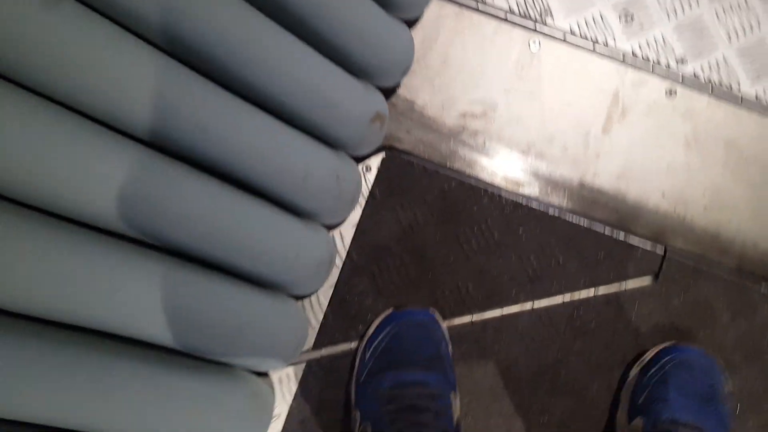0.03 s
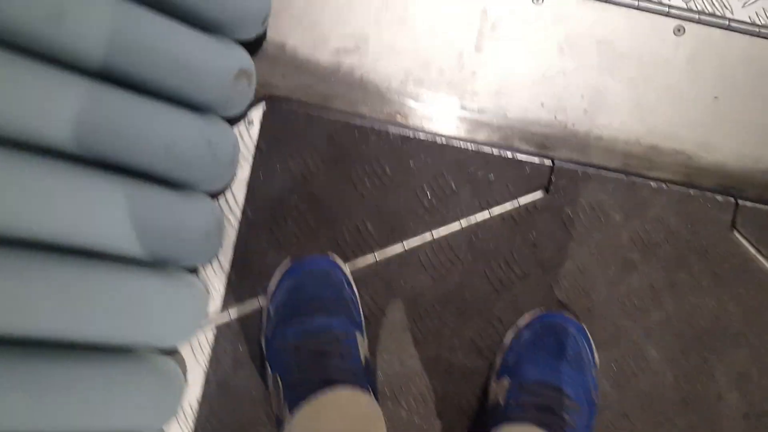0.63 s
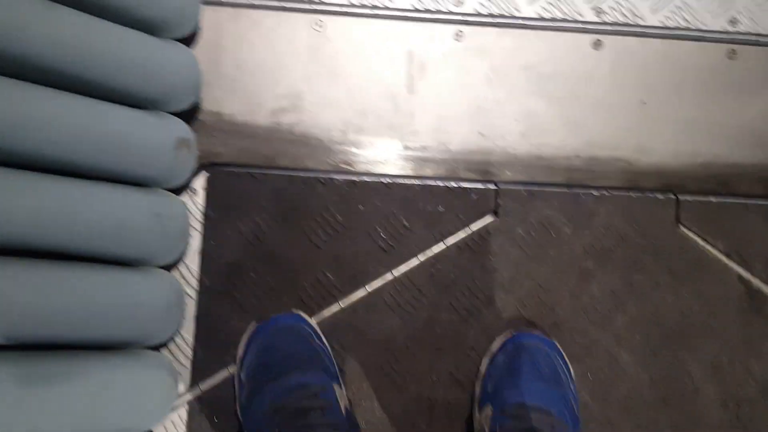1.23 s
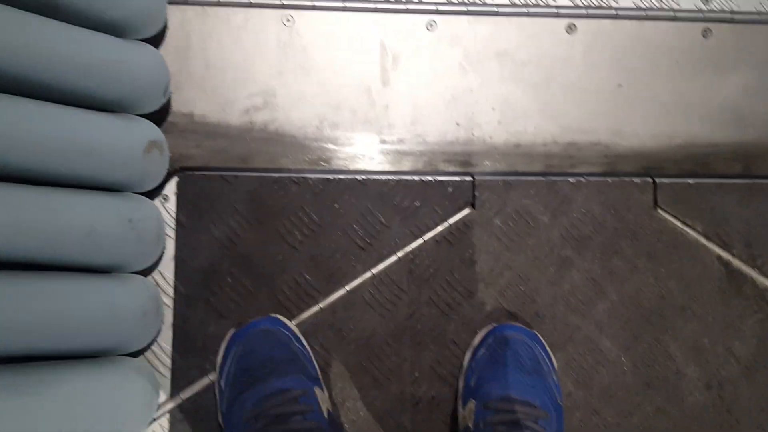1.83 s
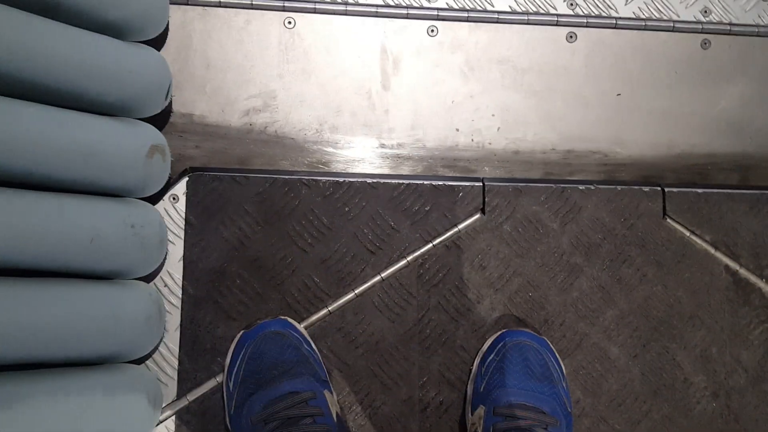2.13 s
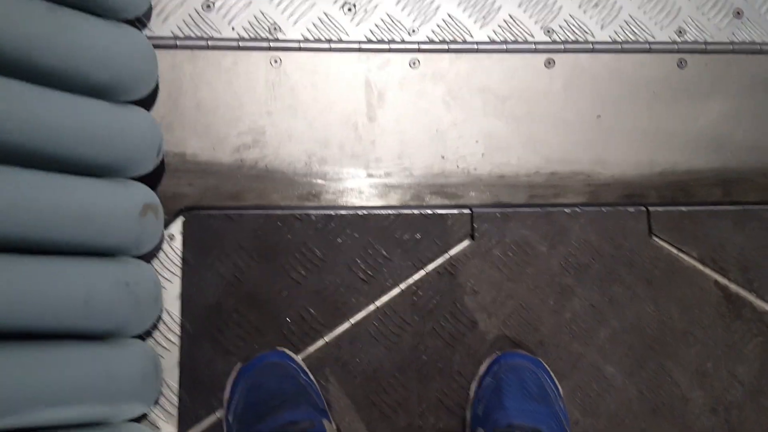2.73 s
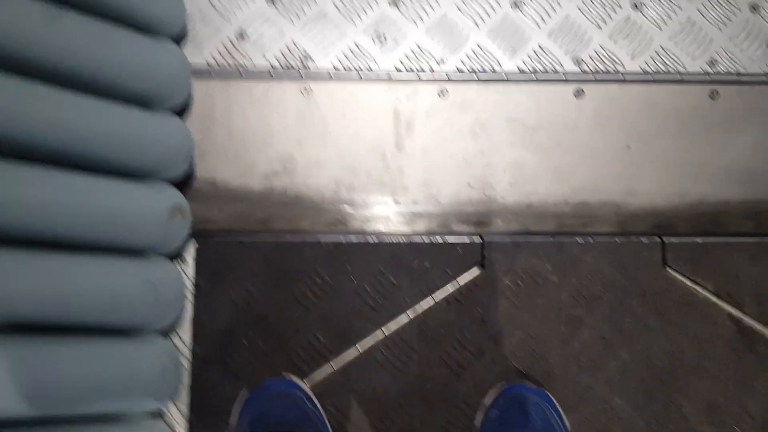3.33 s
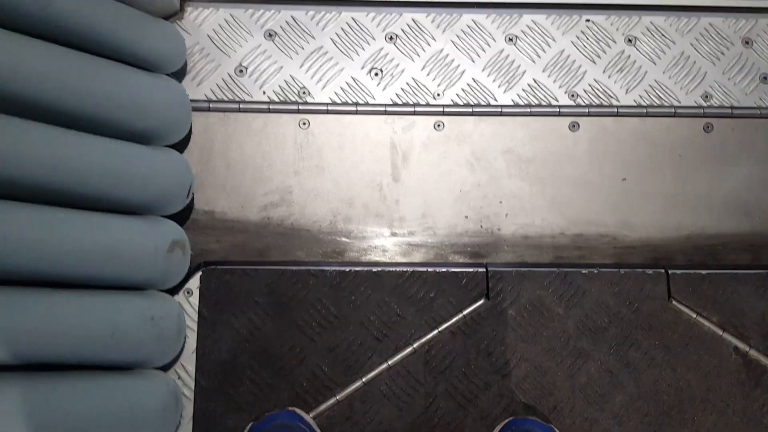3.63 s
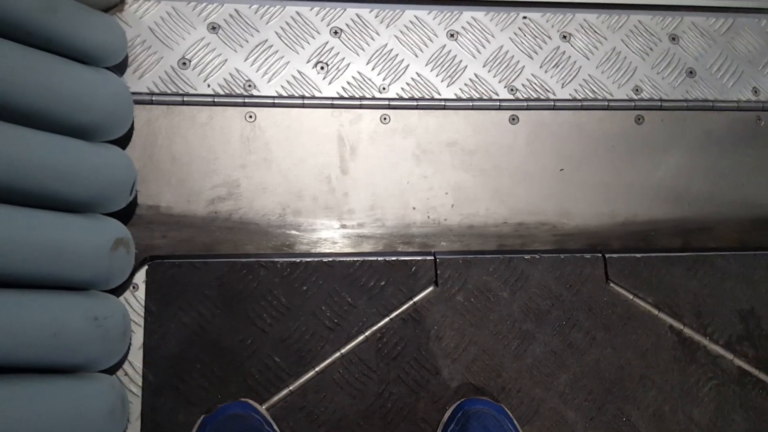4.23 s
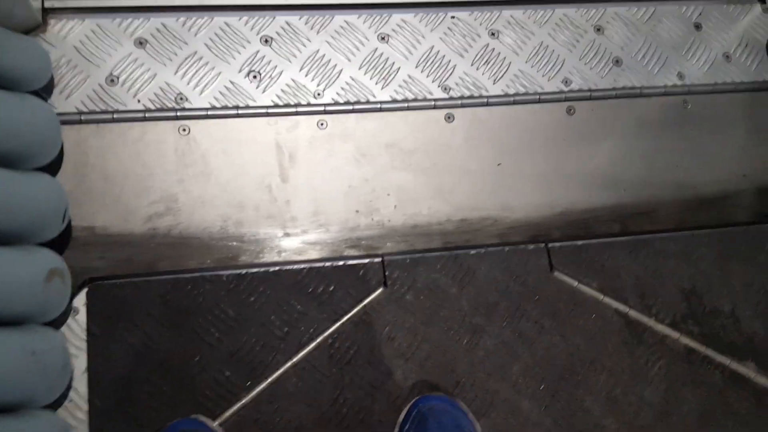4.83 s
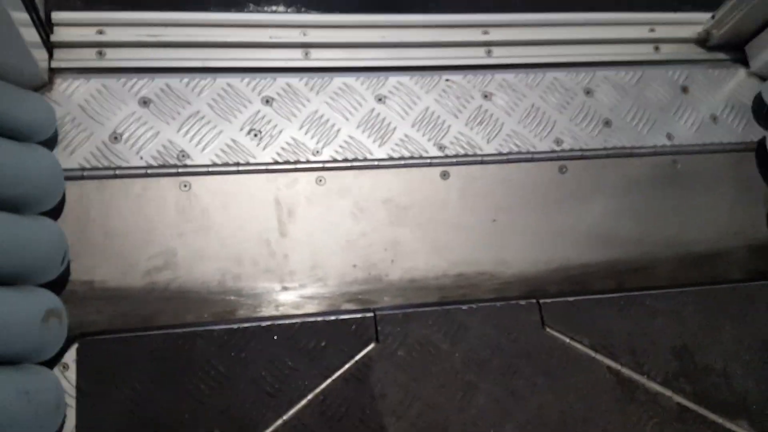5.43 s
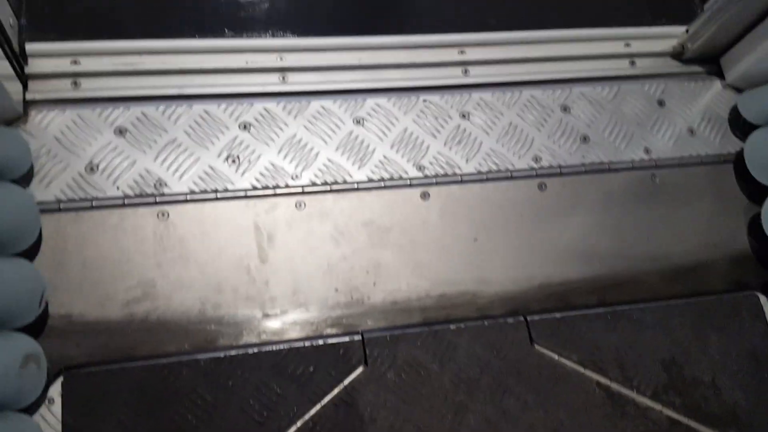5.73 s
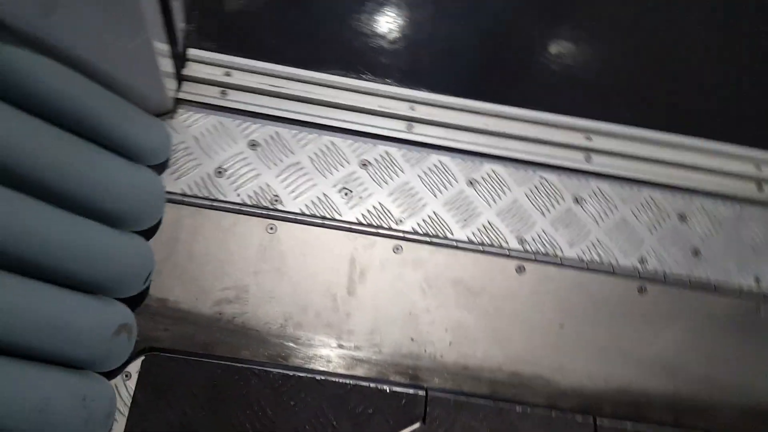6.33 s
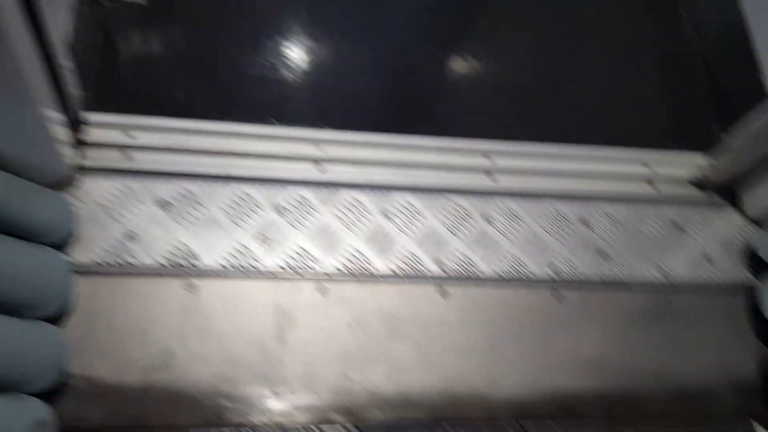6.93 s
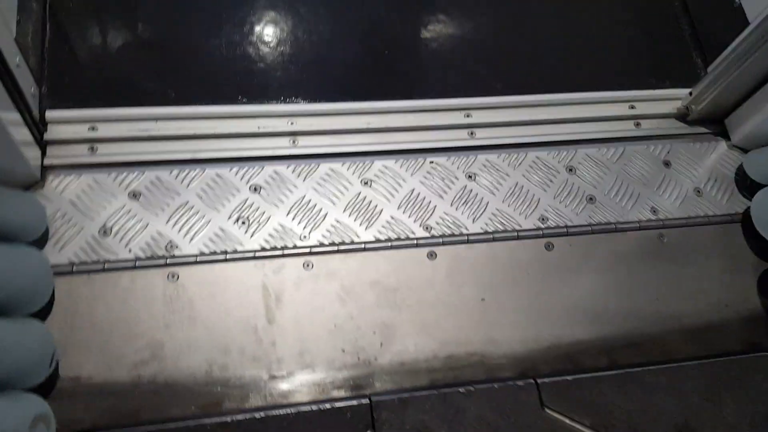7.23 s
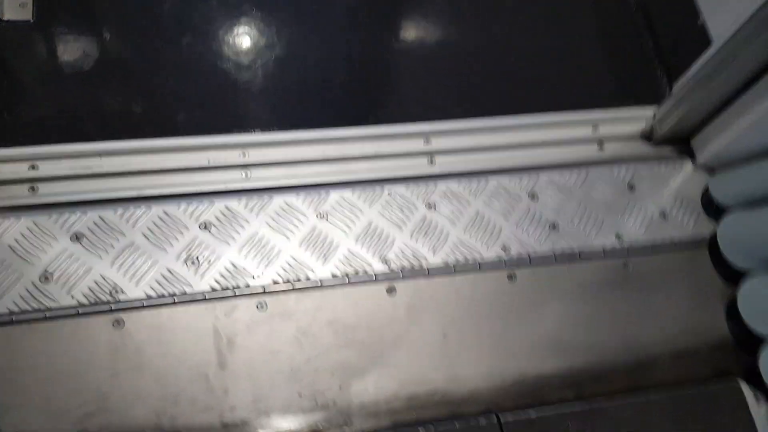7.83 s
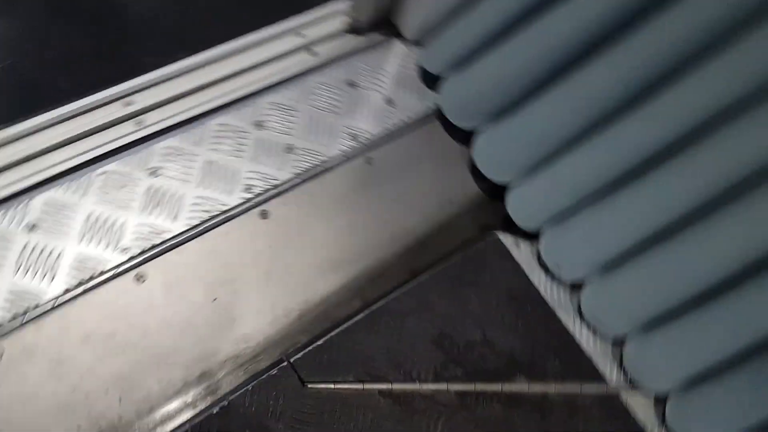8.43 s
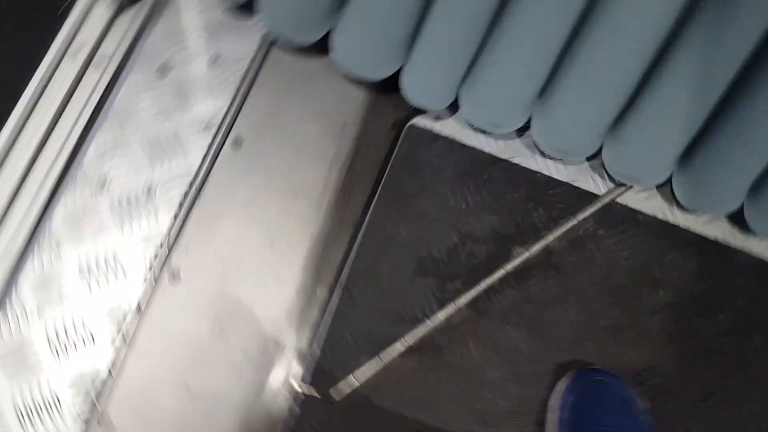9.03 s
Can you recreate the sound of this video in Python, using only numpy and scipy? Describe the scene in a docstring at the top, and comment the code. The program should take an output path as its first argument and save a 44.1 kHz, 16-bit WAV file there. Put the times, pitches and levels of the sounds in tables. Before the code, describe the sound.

A fast train rolls steadily for about nine seconds, heard from inside the enclosed gangway between two cars. The floor, walls and metal plates resonate with a low rumble and a hollow boom, strongest at the very start. Over this sit the roar of the rails and a mid-pitched wheel drone that wanders slightly in pitch, swelling around 4.3 and 8 seconds. Air rushes past the rubber bellows throughout with a soft hiss, leaning a little to the right. A faint steel ring from the wheels rises briefly near 5.2 and 6.7 seconds. During the first second and a half, clothing rubs quietly close to the microphone in several short strokes. Loose fittings give faint, bright ticks around 2 seconds, again at 3.5 and 3.9, and a few more between 8.5 and 9 seconds. The ride continues to the end.

```python
"""In the gangway between two cars of a fast train.
Rolling wheels force the floor, walls, plates and enclosed air into resonance, and rippled rail adds
a drone of wandering pitch, a roar and a faint ring of steel. Turbulent air rushes past the rubber
bellows. Close by, cloth rubs in stick-slip friction at first; then loose fittings give a few bright ticks."""
import sys
import numpy as np
from scipy import signal
from scipy.fft import rfft, irfft, next_fast_len
from scipy.io import wavfile
from scipy.ndimage import uniform_filter1d, minimum_filter1d, map_coordinates

SR = 44100
rng = np.random.default_rng(int(sys.argv[2]) if len(sys.argv) > 2 else 0)


def generate_wav(signal):
    """Clip the signal to [-1, 1] and save it as 16-bit WAV at the path in sys.argv[1]."""
    frames = np.transpose(np.atleast_2d(signal))
    scaled = np.clip(frames, -1, 1) * 32767
    pcm = np.round(scaled).astype(np.int16)
    wavfile.write(sys.argv[1], SR, pcm)


N = 404838
TIME = np.arange(N) / SR
FFT_SIZE = next_fast_len(N, real=True)
BIN_HZ = np.maximum(np.arange(FFT_SIZE // 2 + 1) * SR / FFT_SIZE, 1)

# Resonances. Each row: frequency in Hz, width in Hz, relative level in dB, left minus right in dB.
FLOOR_RESONANCES = [(37, 23, -41, -1), (56, 16, -32.5, 0), (90.6, 33, -34, -1)]  # floor plates over the bogies
WALL_RESONANCES = [(268.4, 19, -31.5, 1.5), (305.2, 18.3, -26.5, -3.5), (311, 106, -26.5, 0)]  # large wall panels
PLATE_RESONANCES = [(370.8, 16, -22, 1), (372, 87, -19, -1.5), (415, 27, -23.5, -1.5)]  # smaller door and tread plates
STANDING_WAVE = [(192.5, 39, -22.8, 3)]  # air across the passage
BELLOWS_CAVITY = [(137.6, 63, -28, 0.5)]  # the hollow of the bellows
DRONE_CORE = [(444.3, 14.3, -20, 0.5)]  # narrow peak of the rolling drone
DRONE_HUMP = [(449.7, 51, -20, 0)]  # broad band beneath that peak
PASSAGE_RESONANCES = [(491.6, 18, -29.5, 0), (511.4, 20, -30.5, 1), (514, 185, -22, -0.5),
                      (552, 25, -40, 1), (628, 26, -36.5, -7), (684, 22, -34, 2), (736, 443, -28, -2)]  # the passage, driven by rail roar
WHEEL_RESONANCES = [(1210, 35, -5, -5), (1860, 41, 2, -3), (2482, 55, -3.5, -5)]  # steel wheels
FIBRE_RESONANCES = [(7500, 1100, -1, 0), (11300, 2000, 1, 4), (14600, 4000, -10, 7)]  # sliding cloth

# Slow courses of loudness. Each row: time in seconds, base level in dB.
FLOOR_LEVEL = [(0, -32.5), (1.1, -35.5), (2.1, -29), (3.7, -29.5), (5.4, -30), (6.8, -28.6), (7.6, -28.5),
               (8.4, -32.5), (8.8, -30), (9.18, -27)]  # rumble of the bogies in the floor
ROAR_LEVEL = [(0, -19), (1, -19.5), (3.6, -19.5), (4.7, -19), (5.5, -18.5), (6.9, -19.5), (8, -16.5),
              (8.5, -21), (9.18, -16)]  # roar of the rails
AIR_LEVEL = [(0, -29.8), (0.7, -31.5), (1.6, -31.5), (2.1, -29.5), (3.4, -28), (4.3, -29), (5.2, -28),
             (5.6, -29.1), (6.7, -27.5), (7.7, -28.9), (8.2, -30.8), (8.6, -30.5), (8.9, -28), (9.18, -29)]  # flow past the bellows
# Surges and lulls of single parts. Each row: middle in seconds, length in seconds, gain in dB, part.
PART_SURGES = [(0.173, 0.66, 8, "boom"), (0.95, .9, 3, "boom"), (3.407, .25, 5, "boom"),
               (3.95, .8, 3.5, "boom"), (5.32, 0.28, -9, "boom"), (6.78, 0.32, 4, "boom"),
               (7.0, .2, 6.5, "boom"), (7.74, 0.32, 3.5, "boom"), (8.303, 0.81, -2.5, "boom"),
               (8.824, .35, 4, "boom"), (0.17, 0.6, 3, "walls"), (1.41, 0.25, 7.5, "walls"),
               (2.27, .4, 6, "walls"), (3.06, .35, 3.5, "walls"), (6.97, 0.43, -9, "walls"),
               (7.927, 0.27, 6.5, "walls"), (8.2, 0.23, 8.5, "walls"), (0.103, 0.16, 6.5, "plates"),
               (0.85, 1.1, 1.5, "plates"), (2.11, .4, 2.5, "plates"), (3.907, 0.37, 7.5, "plates"),
               (5.61, .35, 7.5, "plates"), (0.35, .6, -4, "drone"), (0.75, 0.11, 4, "drone"),
               (1.267, .5, 2, "drone"), (2.897, 0.23, 4.5, "drone"), (4.327, 1.15, 4.5, "drone"),
               (4.94, 0.26, -3.5, "drone"), (6.322, 0.34, 4.5, "drone"), (6.675, 0.64, -3.5, "drone"),
               (7.2, 0.58, 3, "drone"), (8.07, 0.2, 9, "drone"), (8.6, 0.97, -5, "drone"),
               (9.025, 0.12, 4.5, "drone"), (5.502, 0.62, 3, "rails"), (6.312, 0.58, 2, "rails"),
               (8.04, .15, 4, "rails"), (0.15, .5, 2, "bellows"), (2.2, 0.77, 3, "bellows"),
               (6.5, 1.4, 3, "bellows"), (3.2, .35, 1, "floor"), (7.41, 0.26, 5, "floor"),
               (5.22, .25, 10, "steel"), (6.7, 0.18, 5, "steel")]
# Wander of the drone, used as a ratio to its mean. Each row: time in seconds, nominal pitch in Hz.
DRONE_WANDER = [(0, 435.9), (0.8, 420.4), (1.3, 434.9), (2.7, 442), (3.7, 439.1), (4.3, 450.2),
                (5.1, 451.3), (6.3, 441.6), (7.2, 464.4), (8.0, 444.4), (9.18, 447.3)]
# Likeness of the sound on the two sides. Each row: frequency in Hz, correlation.
SIDE_CORRELATION = [(50, 0.98), (100, 1), (240, 0.84), (400, 0.95), (520, 0.71), (680, 0.58), (880, 0.2),
                    (1500, -0.32), (2650, 0.095), (3700, -0.21), (5500, 0)]
# Spectra of the rushing air and its fine hiss. Each row: frequency in Hz, relative spectral level in dB.
RUSH_SPECTRUM = [(530, -34), (900, -8.5), (1050, -1), (1140, -5), (1240, -4), (1390, -4), (1630, -5),
                 (1870, -3), (2320, -7.5), (2740, -7.5), (3600, -22.5), (4680, -53), (7920, -120)]
HISS_SPECTRUM = [(2120, -22), (3600, -1), (4770, 0), (6050, -5.5), (7450, -3), (10900, -17), (15500, -27)]
# Air leaks in mostly on the right. Each row: frequency in Hz, left minus right in dB.
LEAK_BALANCE = [(1050, 0), (1300, -4.5), (1900, -4), (2850, -11), (3600, -1.5), (4100, 1.5), (5000, -7.5),
                (6500, 1), (7600, -0.5), (8900, -2), (10200, 4.5), (15000, 3)]
# Strokes of the cloth. Each row: start in seconds, length in seconds, level in dB.
CLOTH_STROKES = [(-0.02, .11, -50), (0.1, .07, -45), (0.22, .07, -44.5), (0.572, .055, -50.5),
                 (0.85, 0.054, -45.5), (1.155, .05, -48), (1.24, .05, -47), (1.41, .04, -52)]
# Ticks of loose fittings. Each row: start in seconds, level in dB, band centre in Hz, T60 in seconds.
FITTING_TICKS = [(1.862, -58, 13500, .15), (2.178, -59, 13500, .06), (2.188, -49, 12500, .09),
                 (3.481, -48, 13500, .11), (3.857, -59, 13000, .1), (8.537, -57, 11500, .1),
                 (8.692, -59, 13500, .15), (8.932, -52, 13000, .17), (8.942, -50, 9700, 0.17)]


def from_db(db):
    """Amplitude grows tenfold for every 20 dB."""
    return 10 ** (np.asarray(db) / 20)


def unit(x):
    """Normalisation: the mean of the two channels is brought to rms 1."""
    return x / np.sqrt(np.mean(x.mean(axis=0) ** 2) + 1e-20)


def over_time(rows):
    """Linear interpolation gives a curve's value at every sample."""
    seconds, value = np.transpose(rows)
    return np.interp(TIME, seconds, value)


def over_hz(rows):
    """Interpolation in log frequency gives a curve's value at every bin."""
    hz, value = np.transpose(rows)
    return np.interp(np.log(BIN_HZ), np.log(hz), value)


def sides(balance_db):
    """An interaural level difference, split evenly into left and right gains."""
    return from_db(np.array([[.5], [-.5]]) * balance_db)


def drift(rate_hz):
    """Low-pass filtered noise wanders slowly, with standard deviation 1."""
    step = 100
    count = N // step
    pole = np.exp(-2 * np.pi * rate_hz * step / SR)
    slow = signal.lfilter([1], [1, -2 * pole, pole * pole], rng.standard_normal(2 * count))[count:]
    return np.interp(np.arange(N) / step, np.arange(count), slow / slow.std())


def flutter(depth_db, rate_hz):
    """Random amplitude modulation: a gain that wavers."""
    return from_db(depth_db * drift(rate_hz))


def surges_db(part):
    """Slow amplitude modulation: each surge or lull of a part is a raised-cosine arch in dB."""
    return sum(gain_db * np.cos(np.pi * np.clip((TIME - middle_s) / length_s, -.5, .5)) ** 2
               for middle_s, length_s, gain_db, name in PART_SURGES if name == part)


def read_at(x, position):
    """Fractional delay: a stereo sound is read between its samples."""
    return np.array([map_coordinates(channel, [position], order=1, mode="mirror") for channel in x])


def resonances(modes):
    """Incoherent addition: the powers of steep-sided resonances sum to a left and right response."""
    power = 0
    for hz, width, level_db, balance_db in modes:
        detuning = (BIN_HZ ** 2 - hz ** 2) / (BIN_HZ * width)
        power = power + (from_db(level_db) * sides(balance_db)) ** 2 / (width * (1 + detuning ** 2) ** 2)
    return np.sqrt(power)


def diffuse(response):
    """A diffuse field: filtered noise arrives from all round, and long waves reach both sides alike."""
    mid, side = rfft(rng.standard_normal((2, FFT_SIZE)))
    correlation = np.clip(over_hz(SIDE_CORRELATION), -1, 1)
    pair = np.sqrt(1 + correlation) * mid + np.sqrt(1 - correlation) * side * [[1], [-1]]
    return unit(irfft(pair * response, FFT_SIZE)[:, :N])


def steadied(x, span_s, share):
    """Compression: a share of the swells in running power is divided out, and the result normalised."""
    power = uniform_filter1d(x.mean(axis=0) ** 2, int(span_s * SR))
    return unit(x / (power + 1e-9) ** (share / 2))


def ringing(modes, level_db, span_s, share):
    """Forced vibration: resonances under random drive, steadied and set to a level."""
    return from_db(level_db) * steadied(diffuse(resonances(modes)), span_s, share)


def panel_rumble(wall_db=-22.5, plate_db=-19):
    """Structure-borne sound: the bogies shake floor, walls and plates, each in its own modes."""
    floor_db = over_time(FLOOR_LEVEL) + surges_db("floor")
    floor = ringing(FLOOR_RESONANCES, floor_db, span_s=.18, share=.88)
    walls = ringing(WALL_RESONANCES, wall_db + surges_db("walls"), span_s=.09, share=.44)
    plates = ringing(PLATE_RESONANCES, plate_db + surges_db("plates"), span_s=.057, share=.35)
    return floor + walls + plates


def passage_boom(settled_db=-26, extra_db=6, settle_s=5.7):
    """A standing wave between the walls booms strongly at first, then settles."""
    level_db = settled_db + extra_db * np.exp(-TIME / settle_s) + surges_db("boom")
    return ringing(STANDING_WAVE, level_db, span_s=.15, share=.64)


def bellows_hum(base_db=-29, coupling=.25):
    """Cavity resonance: the hollow of the bellows follows a share of the floor's slow swings in level."""
    floor_db = over_time(FLOOR_LEVEL)
    level_db = base_db + coupling * (floor_db - floor_db.mean()) + surges_db("bellows")
    return ringing(BELLOWS_CAVITY, level_db, span_s=.18, share=.45)


def wheel_drone(base_db=-17.5):
    """Corrugation noise: rippled rail drives the wheels at a wandering pitch, over a broad fixed band."""
    wander = over_time(DRONE_WANDER)
    core = ringing(DRONE_CORE, level_db=-2.6, span_s=.089, share=.9)
    core = read_at(core, np.cumsum(wander / wander.mean()))
    hump = ringing(DRONE_HUMP, level_db=-2.96, span_s=.065, share=.75)
    surge_db = surges_db("drone")
    singing = from_db(.35 * surge_db)  # the stronger the drone, the more its core stands out
    return from_db(base_db + surge_db) * (core * singing + hump / singing)


def rail_roar():
    """Broadband rolling noise excites the acoustic modes of the passage."""
    level_db = over_time(ROAR_LEVEL) + surges_db("rails") + .58
    return ringing(PASSAGE_RESONANCES, level_db, span_s=.22, share=.35)


def wheel_ring(base_db=-43, db_per_air_db=1.8):
    """The steel wheels ring faintly at their natural frequencies, swelling along with the rush of air."""
    air_db = over_time(AIR_LEVEL)
    level_db = base_db + db_per_air_db * (air_db - air_db.mean()) + surges_db("steel")
    return ringing(WHEEL_RESONANCES, level_db, span_s=.2, share=.6)


def wall_echoes(x, echo_gain, sway_s, count=5):
    """Comb filtering: close reflections ripple the spectrum; the ripples slide as the listener sways."""
    out = x
    for delay_s in rng.uniform(.00205, .016, count):
        departure_s = TIME - delay_s - sway_s * drift(rate_hz=.28)
        out = out + echo_gain * read_at(x, departure_s * SR)
    return unit(out)


def air_rush():
    """Turbulence on the bellows makes noise; the rubber passes the rush and holds back most hiss."""
    air_db = over_time(AIR_LEVEL)
    lean = sides(over_hz(LEAK_BALANCE))
    rush = diffuse(from_db(over_hz(RUSH_SPECTRUM)) * lean)
    rush = wall_echoes(rush, echo_gain=.075, sway_s=.00014) * flutter(depth_db=.5, rate_hz=38)
    hiss = diffuse(from_db(over_hz(HISS_SPECTRUM)) * lean)
    hiss = wall_echoes(hiss, echo_gain=.08, sway_s=.00008)
    hiss_db = -14.5 - .23 * (air_db - air_db.mean())  # relative to the rush: the hiss swells less
    return from_db(air_db - .04) * flutter(depth_db=.69, rate_hz=19) * (rush + from_db(hiss_db) * hiss)


def cloth_rub(attack_s=.026, t60_s=.65, slide_db=-58, slide_end_s=1.7, slide_fade_s=.2):
    """Stick-slip friction: fibres catch and slip under each stroke, and slide lightly in between."""
    envelope = from_db(slide_db) * np.clip((slide_end_s - TIME) / slide_fade_s, 0, 1)
    for start_s, length_s, level_db in CLOTH_STROKES:
        grip = np.clip((TIME - start_s) / attack_s, 0, 1)
        release = np.exp(-np.log(1000) * np.maximum(TIME - start_s - length_s, 0) / t60_s)
        envelope = np.maximum(envelope, from_db(level_db) * grip * release)
    fibres = diffuse(resonances(FIBRE_RESONANCES)) * flutter(depth_db=.5, rate_hz=150)
    return envelope * unit(fibres)


def fitting_ticks(width_hz=4200, rise_s=.005):
    """Damped transients: loose fittings give grainy scuffs that die away between the metal plates."""
    out = np.zeros((2, N))
    for start_s, level_db, hz, t60_s in FITTING_TICKS:
        start = int(start_s * SR)
        age = TIME[:min(N - start, SR // 2)]
        band = signal.butter(2, [hz - width_hz / 2, hz + width_hz / 2], "band", fs=SR, output="sos")
        scuff = unit(signal.sosfilt(band, rng.standard_normal((2, len(age)))))
        envelope = np.minimum(age / rise_s, 1) * np.exp(-np.log(1000) * age / t60_s)
        out[:, start:start + len(age)] += from_db(level_db) * envelope * scuff
    return out * sides(balance_db=1) * flutter(depth_db=2.5, rate_hz=120)


def limited(x, ceiling_db, release_db_per_s=90, attack_s=.0037):
    """Peak limiting: the gain ducks just ahead of each high peak and recovers at a steady rate."""
    over_db = np.maximum(20 * np.log10(np.abs(x).max(axis=0) + 1e-9) - ceiling_db, 0)
    held_db = np.maximum.accumulate(over_db + release_db_per_s * TIME) - release_db_per_s * TIME
    window = int(attack_s * SR)
    return x * from_db(uniform_filter1d(minimum_filter1d(-held_db, window), window))


def scene():
    """Superposition: the ride, lightly compressed at unchanged rms, adds to air, cloth and ticks."""
    ride = panel_rumble() + passage_boom() + bellows_hum() + wheel_drone() + rail_roar() + wheel_ring()
    ride_rms = np.sqrt(np.mean(ride.mean(axis=0) ** 2))
    ride = ride_rms * steadied(ride, span_s=.027, share=.2)
    return ride + air_rush() + cloth_rub() + fitting_ticks()


def record(dry, cutoff_hz=15800):
    """Peak and band limiting: high peaks are held down, then a steep low-pass cuts the top."""
    lowpass = signal.ellip(12, .1, 90, cutoff_hz, fs=SR, output="sos")
    return signal.sosfilt(lowpass, limited(dry, ceiling_db=-.2))


dry = scene()
out = record(dry)
generate_wav(out)
```